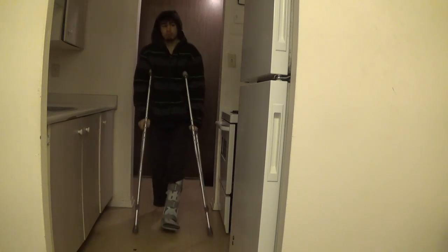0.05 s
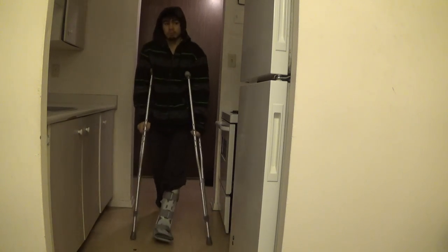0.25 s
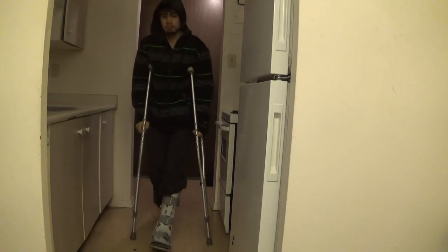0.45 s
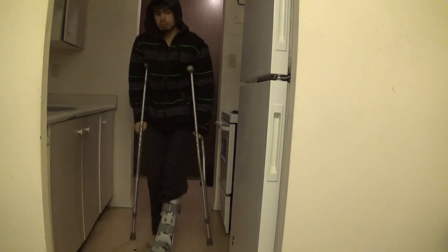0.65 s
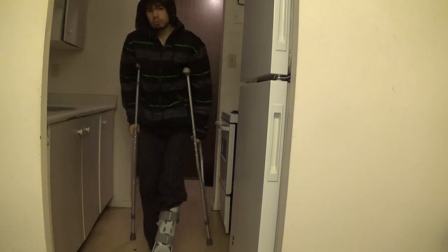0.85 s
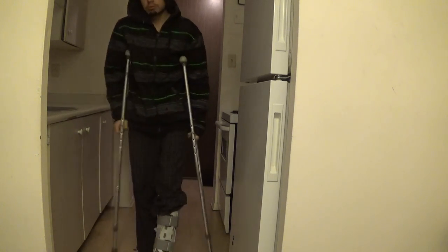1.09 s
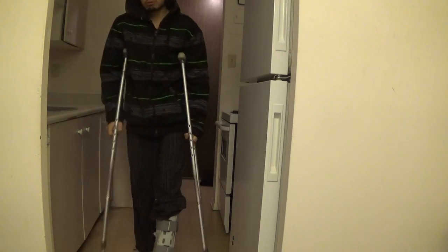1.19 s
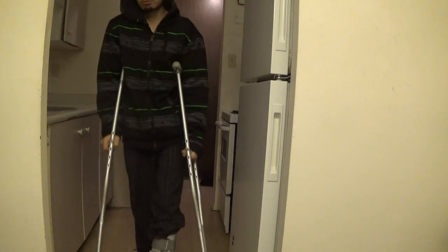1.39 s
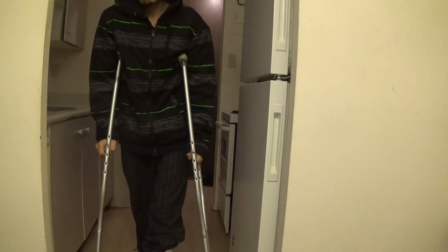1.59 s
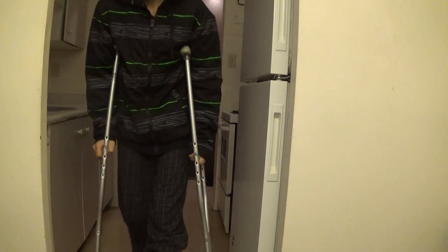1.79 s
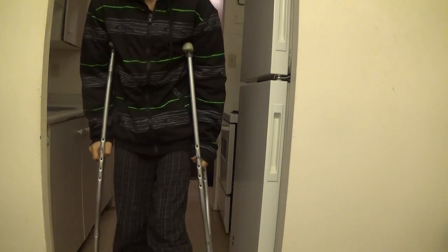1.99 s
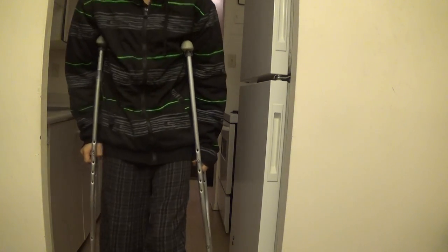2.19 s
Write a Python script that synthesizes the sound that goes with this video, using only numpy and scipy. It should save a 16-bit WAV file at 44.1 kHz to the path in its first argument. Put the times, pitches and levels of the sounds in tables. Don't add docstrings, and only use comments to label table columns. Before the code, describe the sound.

Metal crutches clack on a hard kitchen floor. At 0.2 seconds a farther tip lands in a quick, bright triple clack with short room ring. Faint ticks at 0.6, a grainy boot scuff at 0.8 and light cuff rattles and squeaks around 1.0 follow. At 1.47 a nearer, heavier double clack hits with a low thud. Soft scuffs and a thin squeak end after 2.0, over steady low fridge hum.

```python
import sys
import numpy as np
from scipy import signal
from scipy.io import wavfile
from scipy.ndimage import uniform_filter1d

SR = 44100
rng = np.random.default_rng(int(sys.argv[2]) if len(sys.argv) > 2 else 0)


def to_wav(s):
    ch = np.atleast_2d(s).T
    pcm = np.round(np.clip(ch, -1, 1) * 32767)
    wavfile.write(sys.argv[1], SR, pcm.astype(np.int16))


def field_ratio(decibels):
    return 10 ** (np.asarray(decibels, dtype=float) / 20)


N = 99225
JOINT_HOLD = 1.6
JOINT_SEND_DB = -8


def evened(x):
    return x / np.sqrt(np.mean(x ** 2) + 1e-20)


def read(points, hz):
    f, value = np.transpose(points)
    return np.interp(np.log(hz + 1), np.log(f + 1), value)


def add(mix, s, sound):
    part = mix[..., round(max(s, 0) * SR):][..., :sound.shape[-1]]
    part += sound[..., :part.shape[-1]]


def colour(x, points):
    half = np.log(field_ratio(read(points, np.fft.rfftfreq(2048, 1 / SR))))
    full = np.concatenate([half, half[-2:0:-1]])
    taps = np.fft.ifft(np.exp(full - 1j * signal.hilbert(full).imag)).real[:1024]
    return signal.oaconvolve(x, taps / np.linalg.norm(taps))[:len(x)]


def resonate(x, hz, width):
    turn = np.exp(2j * np.pi * hz * np.arange(x.shape[-1]) / SR)
    r = np.exp(-np.pi * width / SR)
    return 2 * (turn * signal.lfilter([1 - r], [1, -r], x / turn + 1e-18)).real


def twice(x, hz, width):
    return resonate(resonate(x, hz, width), hz, width)


def partner(a, b, same):
    return same * a + np.sqrt(1 - same ** 2) * b


def fridge():
    # frequency in Hz, level in dB per Hz.
    air = [(15, -65), (25, -37), (192, -1.5), (669, -12), (952, -12.5), (1390, -19), (9080, -30),
           (15200, -36), (16500, -81)]
    # frequency in Hz, likeness from 0 to 1.
    likeness = [(60, 0.97), (180, 0.99), (550, 0.9), (1650, 0.55), (4970, 0.77), (15000, 1)]
    # frequency in Hz, width in Hz, level in dB rms.
    hum = [(35, 20, -71.5), (63.4, 12, -67.5), (136.4, 43, -63), (181, 18.4, -56), (207.9, 13.6, -55),
           (261, 47, -58), (336.1, 14.7, -57), (462.5, 42, -64), (541, 24, -67), (878.4, 35, -64),
           (941, 42, -62), (996.7, 29, -63), (1860, 160, -71.5), (2184, 93, -71)]
    # frequency in Hz, width in Hz, level in dB rms.
    whine = [(9150, 160, -75)]
    air_db = -49
    frames, hz = N // 512 + 6, np.fft.rfftfreq(2048, 1 / SR)
    a, b, c, d = rng.standard_normal((frames, 1025, 4)).T
    same = np.clip(read(likeness, hz), -1, 1)[:, None]
    left = a + 1j * b
    white = np.array([left, partner(left, c + 1j * d, same)])

    def back(z):
        return signal.istft(z, nperseg=2048, noverlap=1536)[1][:, 1000:N + 1000]

    flat = back(white)
    tones = sum(field_ratio(db) * evened(resonate(resonate(flat, f, w), f, 2 * w)) for f, w, db in (*hum, *whine))
    return field_ratio(air_db) * evened(back(white * field_ratio(read(air, hz))[:, None])) + tones


def squeak(length, db, hz, wobble_hz):
    noise = rng.standard_normal(6000)
    t = np.arange(6000) / SR
    tone = .7 * np.sin(2 * np.pi * hz * t) + .7 * evened(resonate(noise, hz, 2 * wobble_hz))
    return field_ratio(db) * tone * np.sin(np.pi * np.clip(t / length, 0, 1)) ** .3


def kitchen(x):
    # frequency in Hz, t60 in seconds.
    decay = [(200, 0.99), (500, 0.6), (1000, 0.35), (2000, 0.46), (4000, 0.37), (7000, 0.37), (10000, 0.26),
             (15000, 0.15)]
    # frequency in Hz, likeness from 0 to 1.
    likeness = [(60, 1), (300, 0.91), (1000, 0.88), (4000, 0.78), (8000, 0.84), (13000, 0.95)]
    gap_s, early_db, early_s = .002, 5.5, 0.0075
    hz, t, (a, b) = signal.stft(rng.standard_normal((2, 24000)), SR, nperseg=128)
    same = np.clip(read(likeness, hz), 0, 1)[:, None]
    z = np.array([a, partner(a, b, same)]) * field_ratio(-60 * t / read(decay, hz)[:, None])
    tail = signal.istft(z, SR, nperseg=128)[1]
    age = np.arange(tail.shape[1]) / SR
    tail = tail * np.clip(age / gap_s - 1, 0, 1) * field_ratio(early_db * np.exp(-age / early_s))
    return signal.fftconvolve(x[None], tail / np.linalg.norm(tail[0]), axes=1)[:, :len(x)]


def slips(rattle_s):
    spread_db = 2
    t = np.arange(24000) / SR
    sign, size = rng.standard_normal((2, len(t)))
    swell = np.sin(np.pi * np.clip(t / rattle_s, 0, 1) ** .8) ** .6
    burst = np.sign(sign) * field_ratio(spread_db * size) * swell
    return t, np.array([burst * (t < rattle_s), 1. * (t == 0)])


def voiced(pair):
    energy = np.linalg.norm(pair, axis=1)[:, None]
    return pair / energy * np.linalg.norm(pair[0]) / abs(pair[0]).max()


def chime(peaks, rise):
    damp = 1.8
    t = np.arange(24000) / SR
    phase = rng.uniform(0, 2 * np.pi, 12)
    held = rise * (1 + JOINT_HOLD)
    swell = np.sin(np.pi / 2 * np.minimum(t / rise, 1)) ** 2
    after = np.maximum(t - held, 0)
    out = np.zeros(len(t))
    for (hz, width, db), p in zip(peaks, phase):
        rate = np.pi * width * damp
        level = field_ratio(db) / (held + 1 / rate)
        out += level * np.exp(-rate * after) * np.sin(2 * np.pi * hz * t + p)
    out *= swell
    return out / abs(out).max()


def clack(peak_db, crack_hz, rattle_s, knock_db, splash_db, room_db, joint, splash, tube):
    # frequency in Hz, level in dB.
    knock_tone = [(100, -44.5), (250, -3.5), (420, -8.5), (600, -3), (950, -2.5), (1400, -7), (2000, -5.5),
                  (3500, -20)]
    crack_width_hz, ring_db = 3240, -29
    knock_t60, knock_lag_s = 0.022, 0.002
    t, pair = slips(rattle_s)
    crack = twice(pair, crack_hz, crack_width_hz)
    wide = np.array([colour(x, splash) for x in pair])
    rasp = voiced(voiced(crack) + field_ratio(splash_db) * voiced(wide))
    struck = field_ratio(4 + np.array([[0], [JOINT_SEND_DB]])) * chime(joint, .25 * rattle_s)
    bright = (rasp + struck) / abs(rasp[0] + struck[0]).max()
    ring = sum(field_ratio(db - 60 * t / t60) * np.sin(2 * np.pi * hz * t) for hz, db, t60 in tube)
    ring = ring * np.minimum(t / rattle_s, 1)

    late = np.maximum(t - knock_lag_s, 0)
    push = rng.standard_normal(len(t)) * np.minimum(late / 0.0025, 1) * field_ratio(-60 * late / knock_t60)
    late_click = np.roll(pair[1], 200)
    knock = voiced(np.array([colour(x, knock_tone) for x in (push, late_click)]))
    direct, sent = field_ratio(peak_db) * (bright + field_ratio(ring_db) * ring) + field_ratio(knock_db) * knock
    return direct + field_ratio(room_db) * kitchen(sent)


def tip_landings(mix):
    # start in seconds, peak in dB, crack in Hz, rattle in seconds.
    clacks = [
        (.2080, -9.5, 9600, .0028),
        (.2211, -6.5, 8900, .0024),
        (.2351, -16, 8000, .0016),
        (1.4703, -5.5, 8700, .0023),
        (1.4950, -8.5, 9600, .0019),
    ]
    # knock in dB, wide splash in dB, room in dB.
    weight = [(-28, 6, 5), (-25, 20, 6.5), (-35, -6, 7), (-20, 0, 3), (-19, 4.5, 3.5)]
    # frequency in Hz, width in Hz, level in dB.
    joints = [[(5760, 220, -16), (6880, 230, -11), (9880, 650, 1), (10920, 230, -3), (11440, 340, -8),
              (12800, 310, -10), (13830, 180, -14)] + [(8800, 600, -3), (2900, 700, -15), (1500, 700, -17)],
              [(1480, 380, -12), (2240, 200, -13.5), (4120, 320, -14.5), (5900, 730, -7), (8240, 500, 0.5),
              (9450, 500, -2.5), (10750, 350, 0), (11600, 210, -9)] + [(9750, 500, -1), (4800, 700, -10)],
              [(4100, 210, -11.5), (6250, 250, 0), (8400, 500, -1), (10700, 210, 0), (11600, 250, -5)],
              [(3430, 410, -9.5), (5630, 400, -2.5), (6600, 260, -7.5), (8474, 440, 0), (9640, 790, -0.5),
              (10480, 200, -4), (11700, 220, -12), (13700, 430, -15)] + [(4650, 600, -5), (2800, 500, -11)],
              [(577, 650, -7.5), (2000, 320, -4), (3600, 340, -8), (4450, 360, -3), (5960, 210, -6),
              (6800, 250, -4), (8160, 260, 1), (9170, 170, -5), (10030, 260, -1), (11200, 260, -6)]]
    # frequency in Hz, level in dB per Hz.
    far_splash = [(880, -57), (1500, -22), (3480, -15.5), (4090, -14), (8340, -5.5), (11000, -2.5),
                  (14900, -18), (16500, -19)]
    near_splash = [(500, -20), (1200, -25), (2600, -8), (4400, -4.5), (5600, 0), (10300, -5.5),
                   (12500, -17), (16500, -37.5)]
    # frequency in Hz, level in dB, t60 in seconds.
    far_tube = [(4102, -14, .08), (6627, -14, .15), (8398, -8, .1), (9055, -9, .1), (9750, -6, .08),
                (10710, -3, .07)]
    near_tube = [(965, -10, .12), (2003, -11, .12), (4570, -10, .1), (5163, -4, .14), (5776, -8, .16),
                 (6800, -8, .08), (8170, -6, .1), (9240, -6, .06), (10000, -8, .1)]
    for (s, *row), more, joint in zip(clacks, weight, joints):
        splash, tube = (far_splash, far_tube) if s < 1 else (near_splash, near_tube)
        add(mix, s, clack(*row, *more, joint, splash, tube))


def thud(db, hz, t60):
    t = np.arange(0, .4, 1 / SR)
    return field_ratio(db - 60 * t / t60) * np.sin(2 * np.pi * hz * t) * (1 - np.exp(-t / 0.033)) * 4


def scuff(rise, t60, db, hz):
    width_hz, wide_db, grain_db = 4600, -5.5, 0.5
    hold = 1.07
    noise, grain = rng.standard_normal((2, 20000))
    t = np.arange(20000) / SR
    noise = noise * field_ratio(grain_db * evened(uniform_filter1d(grain, 60)))
    hiss = evened(twice(noise, hz, width_hz))
    hiss = hiss + field_ratio(wide_db) * evened(resonate(noise, 0.5 * hz, 0.42 * hz))
    after = np.maximum(t - rise * (1 + hold), 0)
    return np.minimum(t / rise, 1) ** 0.67 * field_ratio(db - 60 * after / t60) * hiss


def tick(peak_db, hz, width, rattle_s):
    room_db = -12.5
    t, pair = slips(rattle_s)
    direct, sent = field_ratio(peak_db) * voiced(twice(pair, hz, width))
    return direct + field_ratio(room_db) * kitchen(sent)


def rattle(peak_db, rise, rasp_hz, room_db, peaks):
    rasp_db = -5
    t, pair = slips(rise * (2 + JOINT_HOLD))
    broad = resonate(resonate(pair, rasp_hz, rasp_hz), rasp_hz, 2 * rasp_hz)
    rasp, sent = field_ratio(rasp_db) * voiced(broad)
    knock = chime(peaks, rise)
    return field_ratio(peak_db) * (knock + rasp + field_ratio(room_db) * kitchen(sent + field_ratio(JOINT_SEND_DB) * knock))


def cuff_rattles(mix):
    # start in seconds, peak in dB, rise in seconds, rasp in Hz, room in dB.
    knocks = [(.9627, -33.5, .0008, 6000, -1), (.9817, -30, .0008, 3600, -2),
              (1.8148, -38, .0007, 2400, -10)]
    # frequency in Hz, width in Hz, level in dB.
    cuffs = [
        [(2970, 230, -4.5), (3660, 240, -7), (5000, 270, -4.5), (5960, 210, -5), (8100, 610, -0.5),
         (11000, 560, -9)],
        [(2300, 240, -12), (2960, 260, -8), (4970, 320, -0.5), (6070, 200, -10), (6550, 260, -7),
         (8600, 300, -4.5), (11700, 430, -16)],
        [(1930, 290, -2), (2940, 390, 0), (8570, 490, -13), (12800, 620, -19)],
    ]
    for (s, *row), peaks in zip(knocks, cuffs):
        add(mix, s, rattle(*row, peaks))


def scene():
    # start in seconds, length in seconds, level in dB, pitch in Hz, wobble in Hz.
    squeaks = [(0., .04, -67, 11000, 80), (.872, .058, -58.5, 10700, 40), (.962, .022, -63, 10900, 100),
               (1.03, .025, -63, 11000, 80), (1.055, .06, -68, 10750, 50), (1.17, .08, -64, 11150, 60),
               (2.15, .078, -55, 10680, 70), (2.135, .014, -58, 10700, 80), (1.83, .06, -74, 10700, 80),
               (.93, .04, -67, 11100, 80)]
    # start in seconds, level in dB, pitch in Hz, t60 in seconds.
    thuds = [(.225, -49, 68.8, 0.29), (.34, -48, 67, 0.18), (1.49, -48.5, 38.2, .2), (1.5, -52.5, 88, 0.28),
             (1.47, -36.5, 252, 0.097), (1.68, -47, 62.4, .1)]
    # start in seconds, rise in seconds, fall t60 in seconds, level in dB, centre in Hz.
    scuffs = [(.797, 0.021, 0.15, -47.5, 9100), (.966, 0.0031, 0.21, -58, 6500),
              (.984, 0.006, 0.28, -57, 5500), (2.07, .025, .2, -50, 9700), (1.2, 0.1, 0.31, -66, 9400),
              (1.8, 0.037, .5, -72, 9500), (0.67, 0.05, .5, -65.5, 6000), (.6, 0.0076, 0.4, -59, 1600),
              (2.0, 0.061, 0.51, -61, 9200), (2.13, 0.017, 0.49, -58.5, 8500)]
    # start in seconds, peak in dB, pitch in Hz, width in Hz, rattle in seconds.
    ticks = [(.602, -43, 2300, 1500, .002), (.605, -38.5, 1300, 1100, 0.0023),
             (.9795, -37, 10200, 3000, .001), (.9795, -37, 6000, 2500, .001), (.988, -41, 8400, 1500, .001),
             (.9932, -40, 6600, 1200, .002), (1.0125, -41, 5300, 2000, 0.0018),
             (1.027, -48, 6500, 1500, .0015), (1.717, -47, 3300, 900, .002)]
    left_db, soft_room_db = 1, -4.5
    near, soft, floor = np.zeros((2, N)), np.zeros(N), np.zeros(N)
    tip_landings(near)
    cuff_rattles(near)
    for table, voice, mix in ((squeaks, squeak, floor), (thuds, thud, floor),
                              (scuffs, scuff, soft), (ticks, tick, near)):
        for s, *row in table:
            add(mix, s, voice(*row))
    near = near + soft + field_ratio(soft_room_db) * kitchen(soft)
    return near * field_ratio(np.array([[left_db], [-left_db]])) + floor + fridge()


def band_limit(x):
    return signal.sosfilt(signal.butter(12, 16970, fs=SR, output="sos"), x)


def record(dry):
    edge_hz, above_db = 15700, -30
    taps = signal.firwin(255, edge_hz, window=("kaiser", 7), fs=SR)
    low = signal.oaconvolve(dry, taps[None], "same")
    return band_limit(low + field_ratio(above_db) * (dry - low))


dry = scene()
out = record(dry)
to_wav(out)
```